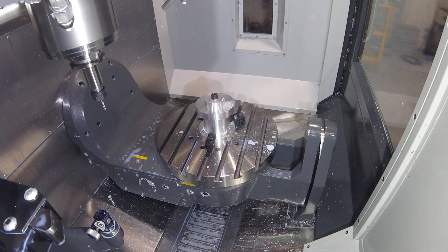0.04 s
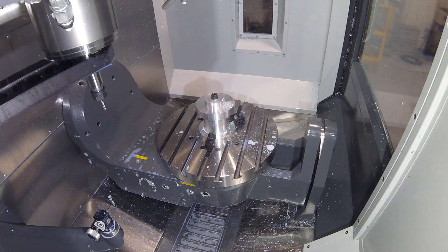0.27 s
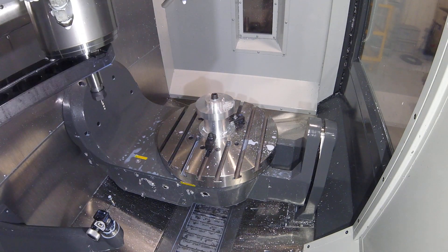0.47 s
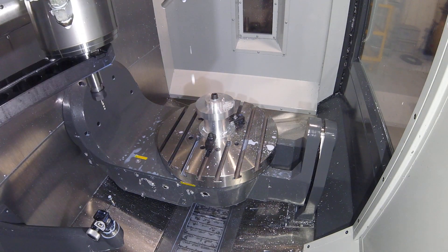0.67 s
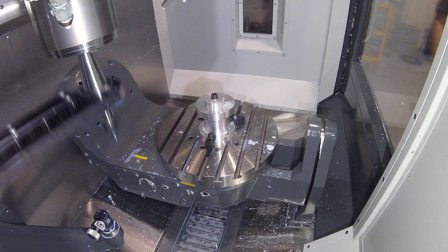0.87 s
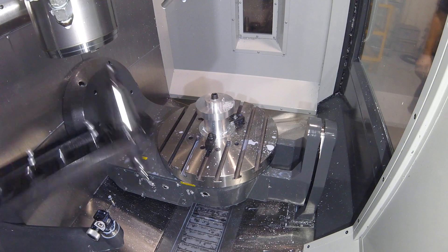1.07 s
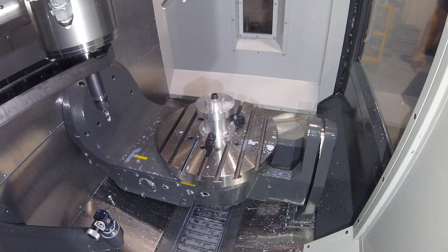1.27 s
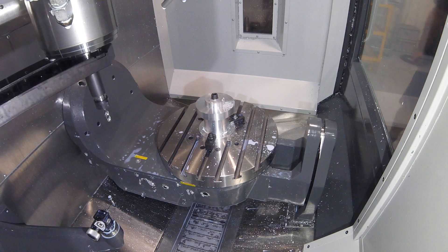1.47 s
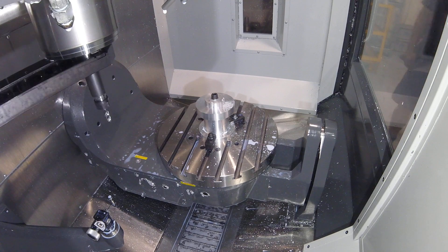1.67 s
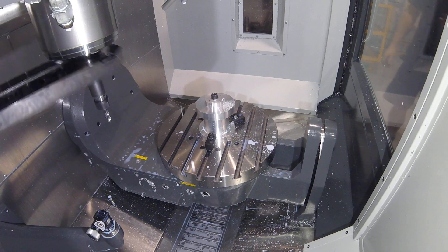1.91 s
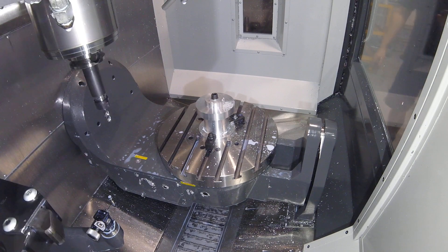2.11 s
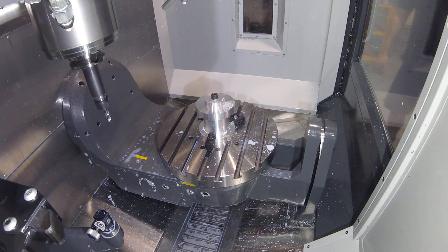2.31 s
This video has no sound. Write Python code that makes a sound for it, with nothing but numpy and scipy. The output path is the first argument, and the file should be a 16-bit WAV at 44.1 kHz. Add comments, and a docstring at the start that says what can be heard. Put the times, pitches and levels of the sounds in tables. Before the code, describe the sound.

Automatic tool changer clanking and knocking, with compressed air hissing over a motor hum.

```python
"""A machining centre changes tools inside its sheet-metal cabin. Air hisses and motors hum throughout. First
the changer door rolls open and clanks against its steel stop at 0.3 s. From about 0.9 s the arm swings round,
rumbling, knocking and whining high, while compressed air puffs through the spindle. At 2 s the door slams shut.
A limiter turns the sound down around the loudest blows."""
import sys
import numpy as np
from scipy import signal
from scipy.fft import rfft, irfft, next_fast_len
from scipy.io import wavfile
from scipy.ndimage import uniform_filter1d, minimum_filter1d, map_coordinates

SR = 44100
rng = np.random.default_rng(int(sys.argv[2]) if len(sys.argv) > 2 else 0)


def store_pcm(level_fs):
    """Save levels as 16-bit WAV."""
    pcm = np.round(np.clip(level_fs, -1, 1) * 32767).astype(np.int16)
    wavfile.write(sys.argv[1], SR, np.atleast_2d(pcm).T)


N = 108045

# How loud each steady or moving part is over time. Each row: time in seconds, level in dB.
MOTOR_LOAD = [(0, -38.5), (.255, -39.5), (.29, -55), (1.45, -49), (1.58, -44), (1.8, -51), (2.2, -43),
              (2.45, -44)]
LEAK_LEVEL = [(0, -47), (.26, -45.5), (.47, -37), (.54, -48), (.66, -58), (.85, -52), (1.38, -51.5),
              (1.52, -42), (1.7, -45.5), (1.95, -47.5), (2.2, -46.5), (2.45, -43.5)]
DRIVE_LEVEL = [(0, -43.5), (.3, -37.5), (.43, -35), (.56, -38), (.84, -40.5), (.92, -26), (1.02, -25.5),
               (1.22, -24), (1.3, -31), (1.5, -34), (1.66, -35.5), (1.9, -40.5), (2.05, -28.5),
               (2.19, -31.5), (2.45, -37)]
GUIDE_LEVEL = [(0, -46), (.3, -54), (.38, -33), (.5, -27.5), (.6, -49), (.84, -58.5), (.93, -38),
               (1.04, -28.5), (1.16, -23.5), (1.27, -35.5), (1.55, -49), (1.95, -65), (2.12, -32),
               (2.25, -52), (2.45, -53)]
ROLLER_LEVEL = [(.1, -57), (.19, -45), (.215, -32), (.26, -28), (.31, -34), (.34, -57), (1.88, -70),
                (1.95, -47), (2.015, -30), (2.04, -65)]
PURGE_LEVEL = [(.89, -55), (.915, -49), (1.0, -44), (1.07, -45), (1.16, -39.5), (1.25, -42), (1.32, -40),
               (1.4, -82)]  # air blowing the spindle's tool socket clean
WHINE_LEVEL = [(.89, -73), (.905, -40.5), (.97, -59), (1.06, -40), (1.15, -40), (1.24, -43), (1.33, -73)]
# The colour of each noise, from bass to treble. Each row: frequency in Hz, level in dB.
LEAK_COLOUR = [(200, -0.5), (700, 5.5), (1200, -2.5), (3200, -0.5), (4000, -6.5), (5300, 1), (6400, 3),
               (7100, -7), (9000, -13.5), (11000, -20.5), (12500, -31)]
DRIVE_COLOUR = [(15, -49), (27, -9), (39, 0), (52, -7.5), (70, -0.5), (95, -17), (125, -13.5), (150, -5),
                (185, -11), (230, -10), (320, -15), (450, -27), (900, -42.5), (2000, -105)]
GUIDE_COLOUR = [(80, 8.5), (220, 3), (340, 6), (420, -1.5), (570, 6), (900, -10), (1200, -12.5),
                (2500, -26), (6000, -71)]
ROLLER_COLOUR = [(100, -10), (340, 5), (440, -5.5), (550, 1), (750, -7), (950, -3), (1150, -17.5),
                 (2500, -30), (6000, -52)]
PURGE_COLOUR = [(1000, -4), (3000, 0.5), (4100, -9), (4900, -8), (5500, -2.5), (6300, -1), (7100, -8.5),
                (9000, -17), (11000, -52), (12000, -54)]
PUFF_COLOUR = [(500, 3.5), (1300, -1.5), (3100, -1), (3800, -7), (5200, -1.5), (6400, 1), (7100, -12),
               (9800, -16.5), (11300, -25), (12500, -63)]
THUD_COLOUR = [(30, -32), (120, -16), (200, -9), (300, -7.5), (430, -7.5), (700, -3.5), (950, -8.5),
               (1250, -11.5), (2500, -23), (6000, -53)]
CLASH_COLOUR = [(500, -4), (1300, -7.5), (1900, -7.5), (2900, -3.5), (4400, -10), (5400, 2), (6200, 5),
                (7000, -8), (8200, -3), (9500, -15.5), (11500, -22.5), (13000, -56)]
DOOR_COLOUR = [(60, -51), (170, -13), (230, 1.5), (350, 3), (430, -3), (570, -2.5), (930, -14), (1250, -28),
               (2500, -56)]
# Humming tones. Each row: pitch in Hz, level in dB.
MOTOR_TONES = [(100.3, 4.5), (237.8, -6), (1664.5, -17)]
PUMP_TONES = [(311, -53)]
# Where the arm whines. Each row: pitch in Hz, width in Hz, level in dB.
WHINE_PEAKS = [(4800, 220, -8), (6410, 260, -4.5)]
# Modes are the notes a struck part rings with; a fade time is how long a sound takes to drop 60 dB.
# Each row: pitch in Hz, level in dB, fade time in seconds.
FRAME_MODES = [(291, -1, 0.12), (348, -1.5, 0.053), (675, -1, 0.017), (870, -2.5, 0.012)]
PANEL_MODES = [(151.5, -19, 0.47), (227.5, -22, 0.55), (261.4, -19, 0.65), (279.2, -10.5, 0.29),
               (317.2, -18, 0.79), (460, -28, 0.44), (561.7, -18, 0.36), (630, -18, 0.16),
               (724.7, -17.5, 0.45), (923, -25, 0.18)]
DOOR_MODES = [(229, -11, 0.56), (312, -9.5, 0.28), (346.7, -1, 0.16), (487.3, -22, 0.8), (590, -10, 0.32),
              (714, -7, 0.1), (854, -13, .25), (946, -4, 0.057)]
STEEL_MODES = [(1820, -16.5, 0.31), (2530, -13, 0.22), (3230, -18, 0.26), (4000, -16, 0.28),
               (5480, -16, 0.1), (5870, 1.5, 0.068), (5990, -8.5, 0.084), (6350, -14, .22),
               (7900, -7.5, 0.29), (8030, -20, .25)]  # each clank scales these fade times
# How the cabin's echo and the steel's clash die away. Each row: frequency in Hz, fade time in seconds.
CABIN_FADE = [(100, 0.47), (300, 0.7), (900, 0.31), (3000, .3)]
CLASH_FADE = [(1500, 0.34), (6000, 0.22), (11000, 0.16)]
# Puffs of air. Each row: start in seconds, level in dB, rise and fade times in seconds,
# treble tilt in dB per octave.
PUFFS = [(0.862, -41.5, 0.0051, 0.6, -4.5), (0.907, -26, 0.011, 0.33, -1), (1.138, -23.5, 0.0042, 0.18, -5),
         (1.22, -29, 0.0028, 0.56, -4), (1.284, -25, 0.014, 0.3, 0), (1.54, -41, .03, 0.22, 6.5),
         (2.33, -35, 0.0078, 0.24, -9.5)]
# Blows on the cabin. Each row: start in seconds, level in dB, brightness in Hz, panel ring and echo in dB.
KNOCKS = [(.21, -31, 800, -4), (0.288, -17, 600, 3), (0.344, -3, 1020, -2), (.3665, 0, 955, -1),
          (0.3706, 3.5, 292, 2), (.389, -9, 326, -0.5), (.456, -12, 805, -2), (0.525, -20, 394, 2.5),
          (.633, -24, 900, 4), (0.864, -28.5, 980, 7.5), (0.9, -13.5, 880, -2), (.918, -16.5, 453, 2),
          (1.003, -5, 139, -8), (1.062, -17.5, 670, 5.5), (1.089, -15.5, 420, 0), (1.112, -13, 720, 0),
          (1.141, -15.5, 1200, -5.5), (1.162, -13, 650, -3.5), (1.253, -23, 900, 5), (1.283, -10.5, 960, 1),
          (1.2914, -3.5, 277, 0), (1.3236, -0.5, 270, -2.5), (1.378, -22, 410, -15),
          (1.679, -11.5, 232, -5), (2.164, -21, 116.5, 0), (2.335, -21, 380, -1)]
# The door hits its stops. Each row: start in seconds, level in dB, steel ring in dB, door boom in dB,
# ring length factor, treble tilt in dB per octave.
CLANKS = [(0.3135, -9.5, -5, 4.5, 0.79, -1.1), (2.0195, -11.5, -4.5, 4.5, 0.98, 0.1)]

STEEL_ROUGH_RAD, PANEL_ROUGH_RAD = 1, 0.21  # how far the phase of a ringing note wanders
THUD_FADE_S = 0.072
LIMIT_DB, LOOK_AHEAD_S, HOLD_S, RELEASE_DB_PER_S = -5, 0.058, 0.0083, 26.5
LOW_CUT_HZ, TOP_HZ = 20, 11900


def amp(db):
    """Turn decibels into a gain."""
    return 10 ** (np.asarray(db) / 20)


def unit(x):
    """Scale a sound to an average (rms) strength of 1."""
    return x / np.sqrt(np.mean(x ** 2) + 1e-20)


def along(points, hz):
    """Read between the rows of a frequency table, spaced by octaves."""
    row_hz, values = np.transpose(points)
    return np.interp(np.log(hz + 1), np.log(row_hz + 1), values)


def level(points):
    """Turn a table of levels over time into a gain for every sample."""
    return amp(np.interp(np.arange(N) / SR, *np.transpose(points)))


def wobble(rate):
    """A smooth curve through `rate` random values a second."""
    return map_coordinates(rng.standard_normal(2048), [np.arange(N) * rate / SR], mode="wrap")


def filtered(x, response):
    """Give each frequency of x the gain that `response` asks for."""
    size = next_fast_len(len(x) + 8192)
    return irfft(rfft(x, size) * response(np.fft.rfftfreq(size, 1 / SR)), size)[:len(x)]


def noise(colour, size=N, tilt_db=0):
    """Coloured noise of strength 1, tilted by tilt_db for each octave above 1000 Hz."""
    def response(hz):
        return amp(along(colour, hz) + tilt_db * np.log2(np.maximum(hz, 1000) / 1000))
    return unit(filtered(rng.standard_normal(size), response))


def dying(x, fades):
    """Let each frequency of x die away at its own speed."""
    hz, t, spectrum = signal.stft(x, SR, nperseg=256)
    fading = amp(-60 * t / along(fades, hz)[:, None])
    return signal.istft(spectrum * fading, SR, nperseg=256)[1][:len(x)]


def ring(modes, t, rough, wander_per_s, scatter_db, detune):
    """Struck metal rings with wavering, fading notes, a little different at every blow."""
    chance = rng.standard_normal((len(modes), 2))
    out = np.zeros(len(t))
    for k, ((hz, db, fade), (louder, higher)) in enumerate(zip(modes, chance)):
        wander = wobble(wander_per_s)[:len(t)]
        phase = 2 * np.pi * hz * (1 + detune * higher) * t + rough * (wander - wander[0])
        out += (-1) ** k * amp(db + scatter_db * louder - 60 * t / fade) * np.sin(phase)
    return out


def tones(rows, drift):
    """Slightly unsteady pure tones."""
    t = np.arange(N) / SR
    return sum(np.sqrt(2) * amp(db) * np.sin(2 * np.pi * hz * t + drift * wobble(9.14))
               for hz, db in rows)


def add(track, start, sound):
    """Mix a sound into the track at `start` seconds."""
    part = track[round(start * SR):][:len(sound)]
    part += sound[:len(part)]


def hum():
    """The motors hum louder under load, over the pump's even tone."""
    return level(MOTOR_LOAD) * tones(MOTOR_TONES, drift=.2) + tones(PUMP_TONES, drift=.5)


def rattle(colour):
    """Noise whose level flickers quickly and slightly."""
    return unit(noise(colour) * amp(0.5 * wobble(rate=120)))


def drives():
    """The drives rumble; the arm's guides and the door's rollers rattle as they move."""
    rumble = level(DRIVE_LEVEL) * noise(DRIVE_COLOUR)
    guides = level(GUIDE_LEVEL) * rattle(GUIDE_COLOUR)
    rollers = level(ROLLER_LEVEL) * rattle(ROLLER_COLOUR)
    return rumble + guides + rollers


def compressed_air():
    """Valves puff, the tool socket is blown clean while the tool is out, and the seals hiss."""
    puffs, t = np.zeros(N), np.arange(SR) / SR
    for start, db, rise, fade, tilt in PUFFS:
        envelope = np.minimum(t / rise, 1) * amp(db - 60 * np.maximum(t - rise, 0) / fade)
        add(puffs, start, envelope * noise(PUFF_COLOUR, size=SR, tilt_db=tilt))
    purge = level(PURGE_LEVEL) * noise(PURGE_COLOUR)
    leak = level(LEAK_LEVEL) * noise(LEAK_COLOUR)
    return puffs + purge + leak


def arm_whine():
    """The swinging arm whines at two high pitches."""
    def peaks(f):
        return sum(amp(db) / (1 + ((f - hz) / (width / 2)) ** 2) for hz, width, db in WHINE_PEAKS)
    return level(WHINE_LEVEL) * unit(filtered(rng.standard_normal(N), peaks))


def knocks():
    """Blows thud in the frame, ring the panels and echo in the cabin; some are dull, others bright."""
    out, t = np.zeros(N), np.arange(SR) / SR
    for start, db, bright_hz, ring_db in KNOCKS:
        thud = amp(-11.5 - 60 * t / THUD_FADE_S) * noise(THUD_COLOUR, size=SR)
        frame = ring(FRAME_MODES, t, PANEL_ROUGH_RAD, wander_per_s=75, scatter_db=2, detune=0.0079)
        panels = ring(PANEL_MODES, t, PANEL_ROUGH_RAD, wander_per_s=26.7, scatter_db=2, detune=0.0043)
        echo = amp(-17.5) * dying(noise(THUD_COLOUR, size=SR), CABIN_FADE)
        blow = thud + amp(-1.5) * frame + amp(ring_db) * (amp(-3) * panels + echo)
        treble_cut = signal.butter(2, bright_hz, fs=SR)
        add(out, start, amp(db) * signal.lfilter(*treble_cut, blow))
    return out


def door_clanks():
    """The door hits its stop: the steel cracks, clashes and rings while the door's sheet booms."""
    out, t = np.zeros(N), np.arange(SR) / SR
    for start, db, ring_db, boom_db, length, tilt in CLANKS:
        crack = amp(-14.5 - 60 * t / 0.005) * noise(CLASH_COLOUR, size=SR, tilt_db=tilt)  # 5 ms long
        clash = dying(noise(CLASH_COLOUR, size=SR, tilt_db=tilt), CLASH_FADE)
        modes = np.array(STEEL_MODES) * [1, 1, length]
        steel = ring(modes, t, STEEL_ROUGH_RAD, wander_per_s=161, scatter_db=5.5, detune=0.0024)
        sheet = ring(DOOR_MODES, t, PANEL_ROUGH_RAD, wander_per_s=34.7, scatter_db=-1.0, detune=0.0022)
        thud = amp(-5.5 - 60 * t / THUD_FADE_S) * noise(DOOR_COLOUR, size=SR)
        echo = amp(-10.5) * dying(noise(DOOR_COLOUR, size=SR), CABIN_FADE)
        boom = amp(0.5) * sheet + thud + echo
        add(out, start, amp(db) * (crack + clash + amp(ring_db) * steel + amp(boom_db) * boom))
    return out


def scene():
    """All parts of the machine together, in one channel."""
    return (hum() + knocks() + door_clanks() + compressed_air() + arm_whine() + drives())[None]


def limiter(x):
    """The volume drops just before a loud blow, holds, then comes back steadily."""
    need_db = np.minimum(LIMIT_DB - 20 * np.log10(np.abs(x) + 1e-12), 0)
    ahead, hold = int(LOOK_AHEAD_S * SR), int(HOLD_S * SR)
    held_db = minimum_filter1d(need_db, ahead + hold + 1, origin=(hold - ahead) // 2)
    climb_db = RELEASE_DB_PER_S * np.arange(N) / SR
    gain_db = np.minimum.accumulate(held_db - climb_db) + climb_db
    return x * amp(uniform_filter1d(gain_db, size=128))


def record(dry):
    """Cut the deepest bass, limit the peaks and remove the highest treble."""
    bass_cut = signal.butter(4, LOW_CUT_HZ, "high", fs=SR, output="sos")
    limited = limiter(signal.sosfilt(bass_cut, dry[0]))
    return filtered(limited, lambda hz: hz < TOP_HZ)[None]


dry = scene()
out = record(dry)
store_pcm(out)
```